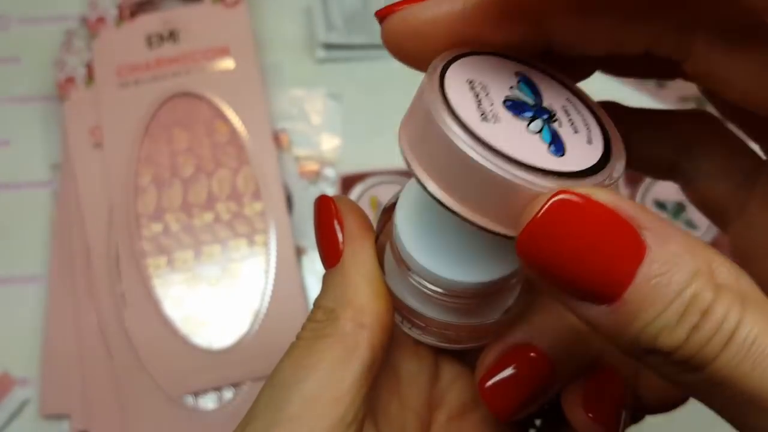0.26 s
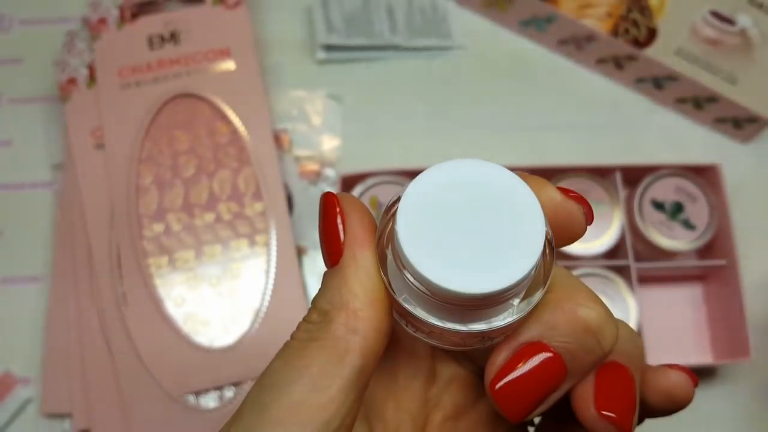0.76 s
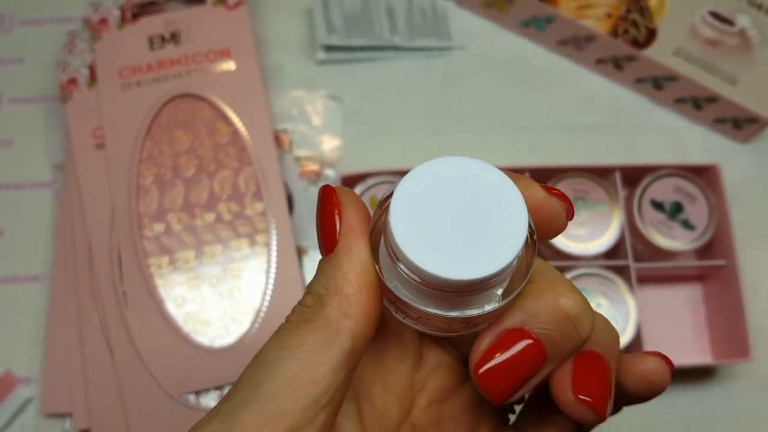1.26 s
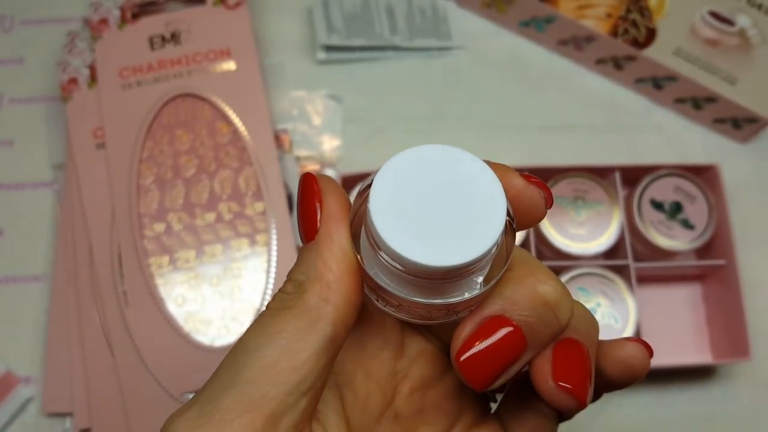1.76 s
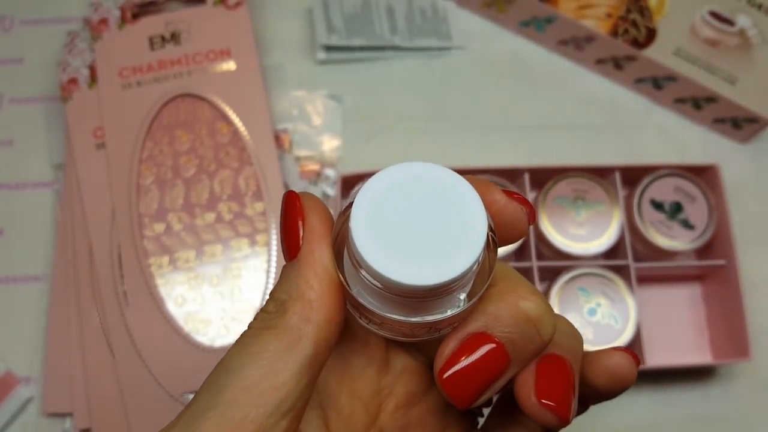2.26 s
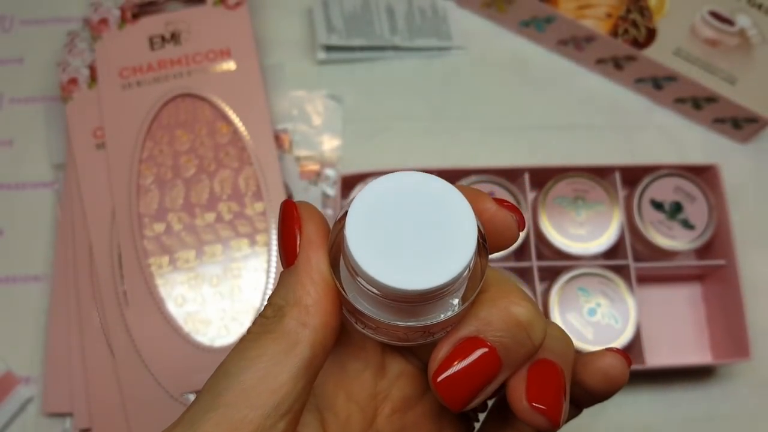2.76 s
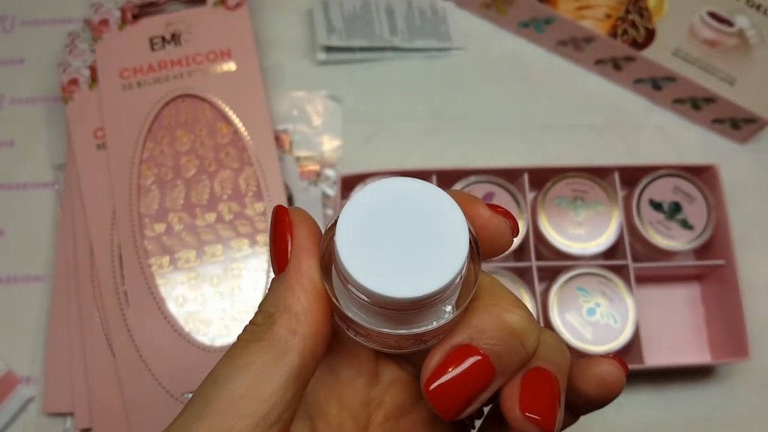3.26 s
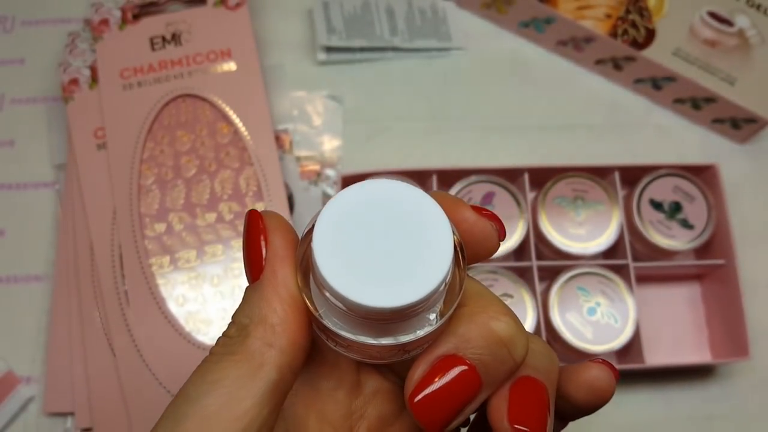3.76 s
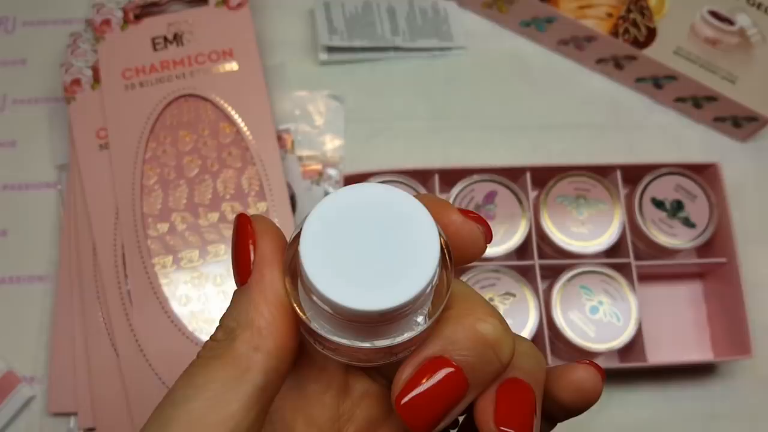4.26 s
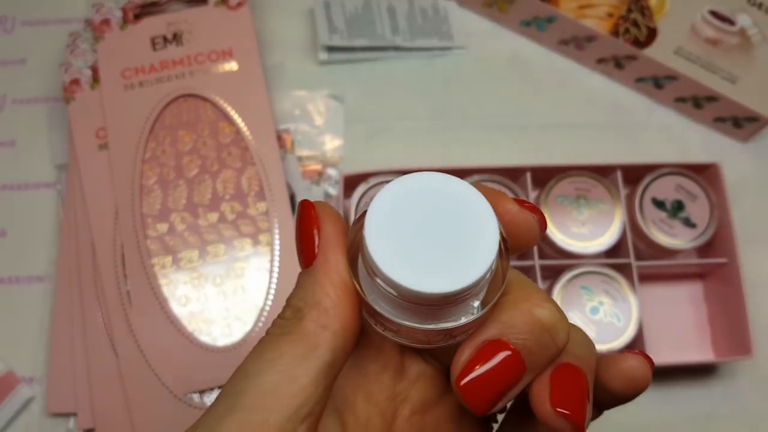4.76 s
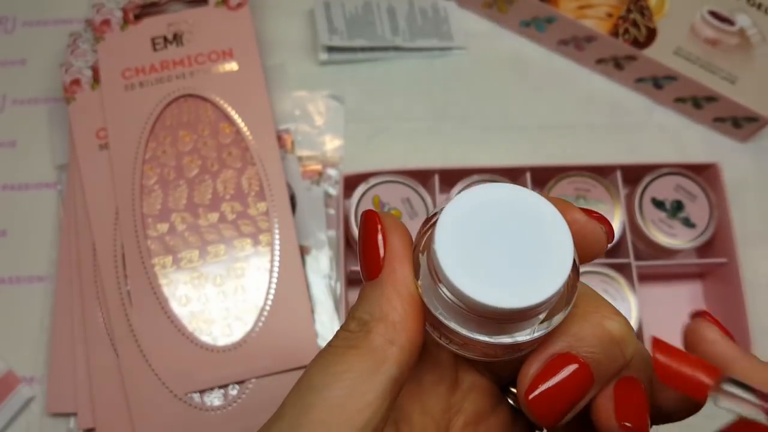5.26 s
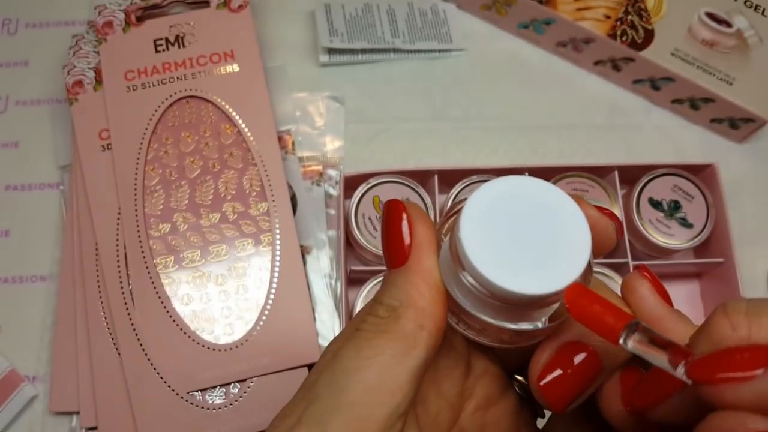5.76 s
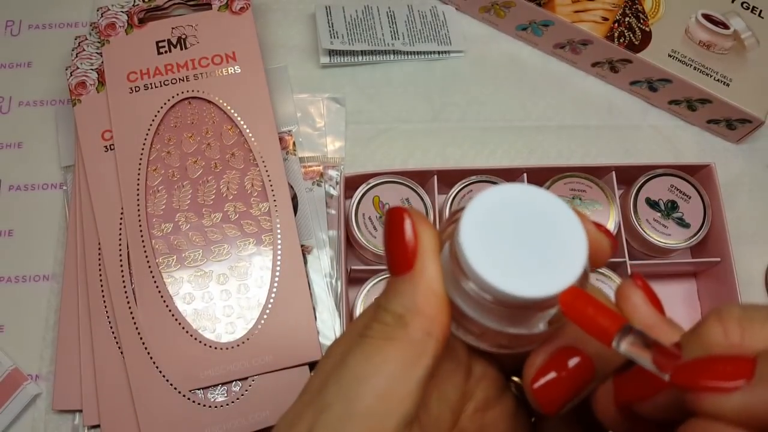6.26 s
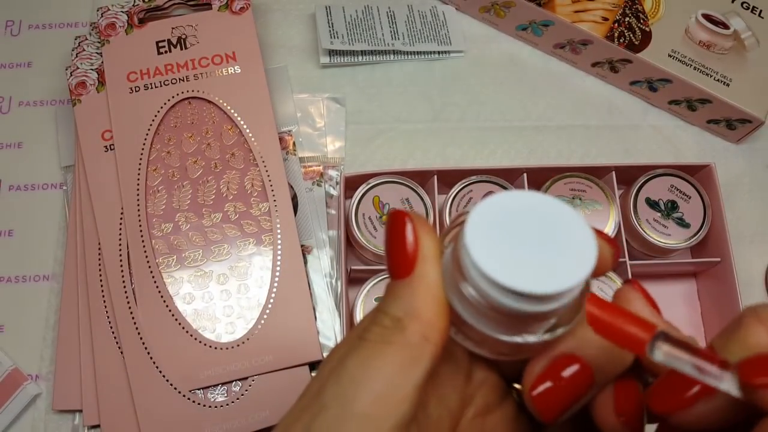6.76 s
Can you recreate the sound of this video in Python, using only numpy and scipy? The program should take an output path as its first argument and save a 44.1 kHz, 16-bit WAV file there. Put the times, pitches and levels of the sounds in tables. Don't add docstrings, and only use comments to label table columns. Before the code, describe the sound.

A plastic lid scrapes briefly over a desk and drops with a loud clack, then soft thumps and clicks, and finally a crackling foil seal peel.

```python
import sys
import numpy as np
from scipy import signal
from scipy.fft import rfft, irfft, next_fast_len
from scipy.io import wavfile
from scipy.ndimage import uniform_filter1d

SR = 44100
rng = np.random.default_rng(int(sys.argv[2]) if len(sys.argv) > 2 else 0)


def waveform_to_disk(signal):
    frames = np.transpose(np.atleast_2d(signal))
    scaled = np.clip(frames, -1, 1) * 32767
    samples = np.round(scaled).astype(np.int16)
    wavfile.write(sys.argv[1], SR, samples)


def rack_gain(trim_db):
    fader = np.asarray(trim_db, float)
    return 10 ** (fader / 20)


N = 309582
T = np.arange(N) / SR

# (frequency [Hz], level [dB])
HISS_SPECTRUM = [(20, -15), (40, -2), (65, 1.5), (170, -1.5), (270, -2), (450, -7.5), (1000, -11),
                 (3000, -15), (5500, -18.5), (7800, -22.5), (9000, -20), (12500, -18), (14500, -23)]
# (frequency [Hz], likeness [-1..1])
HISS_LIKENESS = [(60, 0.062), (240, 0.016), (930, -0.058), (3650, -0.081), (14400, -0.43)]
# (frequency [Hz], left level [dB], right level [dB], left lead [rad])
SUPPLY_TONES = [(49.6, -80.5, -85.5, 0.36), (1358, -79.5, -86.5, 1.57), (2716, -81, -94, 2.8)]
# (time [s], phase [cycles])
READOUT_PHASE = [
    (0, -.34),
    (1.5, .42),
    (2.5, .56),
    (3.02, .1),
    (3.5, .53),
    (6.02, 0),
    (6.72, .5),
]
# (frequency [Hz], t60 [s])
ROOM_T60 = [(100, 0.75), (500, 0.401), (2000, 0.39), (5000, 0.47), (12000, 0.2)]
# (frequency [Hz], likeness [-1..1])
ROOM_LIKENESS = [(100, 1), (300, 1), (700, 1), (1400, 0.106)]
# (frequency [Hz], width [Hz], level [dB])
DESK_MODES = [(88.6, 9.9, -32.5), (112.4, 20.5, 6.5), (166.1, 38.2, -11), (176, 9.2, 0.5), (291.4, 46.6, 8),
              (407, 19.8, -14.5)]
# (time [s], peak level [dB], push [Hz], desk ring level [dB], upper modes level [dB])
SOFT_BLOWS = [(1.088, -58.5, 117, -58.5, -63.5), (1.14, -68, 111, -63.5, -90.5),
              (1.733, -41, 332.5, -46.5, -57.5), (1.777, -65, 115.4, -64, -50.5),
              (1.922, -50.5, 330, -74.5, -39), (2.403, -27.5, 354.7, -53, -45),
              (3.756, -39.5, 164.5, -53, -48), (3.848, -52, 106, -71.5, -70.5),
              (4.023, -52.5, 107, -56, -55.5), (4.219, -37.5, 134.7, -52, -46.5),
              (4.338, -53, 285, -52, -52.5), (4.393, -45.5, 118.7, -52, -48),
              (4.499, -35.5, 107.7, -67.5, -50.5), (4.546, -34.5, 152.2, -55, -43.5),
              (4.561, -33, 119.6, -54, -62)]
# (time [s], strength [dB], hardness [dB], shell pitch [Hz], weight [dB])
SMALL_CONTACTS = [(1.05, -62, 11.5, 3400, -7), (1.3498, -59, 0.5, 3970, -8.5), (1.7322, -44, 7, 1440, 0),
                  (1.7681, -41.5, -20, 1692, -13), (1.8914, -35, -30.5, 2160, -28.5),
                  (1.9319, -43.5, 21, 3360, -12), (1.9407, -55.5, 21, 1420, -10),
                  (2.604, -47.5, 10, 2804, -1.5), (3.7564, -55, 2.5, 3460, 5.5),
                  (4.0325, -49.5, -4.5, 1518, -0.5), (4.2201, -67, 7.5, 1670, 11),
                  (4.2497, -81.5, 25.5, 2330, -4), (4.3936, -64, -0.5, 4090, 11),
                  (4.489, -54, -3.5, 1552, -5), (4.5469, -52, -1.5, 1570, -2), (4.559, -49.5, 5, 2009, 0.5),
                  (4.57, -56, 16.5, 4578, -13), (4.856, -64, 6.5, 2200, -19), (4.8695, -56, 4, 2689, -17)]
# (time [s], length [s], weight [dB], roughness [dB], fineness [dB])
BRUSH_STROKES = [(0.693, 0.137, -72, -4.5, 2), (1.07, 0.255, -83.5, 12, 13.5),
                 (3.749, 0.0866, -61.5, -21.5, 0.5), (3.857, 0.149, -75.5, 9.5, 8.5),
                 (4.032, 0.085, -81.5, -0.5, 2), (4.243, 0.0774, -64, 0, -15.5), (4.305, 0.1164, -61, 9, 1),
                 (4.539, 0.0374, -48, -7, -4.5), (4.59, 0.153, -70.5, -12.5, -6), (4.79, 0.096, -78, 3, 15),
                 (5.74, 0.115, -72.5, -2.5, -4.5), (6.07, 0.0643, -78, -7, -4)]
# (time [s], pull level [dB])
SEAL_PULL = [
    (6.46, -84.5),
    (6.5, -65.5),
    (6.585, -65),
    (6.6, -75),
    (6.615, -65),
    (6.66, -62.5),
    (6.69, -57),
    (6.75, -58.5),
    (6.81, -70.5),
]
# (time [s], peak level [dB], snap [Hz], depth [dB], jar wall [Hz])
GLUE_CRACKS = [(6.3944, -45, 10900, -9, 1375), (6.4627, -52, 10900, -24, 1360),
               (6.4799, -57.5, 6310, -23.5, 3860), (6.4975, -43, 6100, -33, 3860),
               (6.5095, -48.5, 9500, -22, 3780), (6.5148, -52, 5130, -15, 3390),
               (6.525, -47, 5100, -8.5, 1210), (6.5296, -34, 6170, -29, 3080),
               (6.5558, -44, 11300, -13, 4070), (6.573, -44.5, 10830, -26, 4340),
               (6.5888, -38.5, 13900, -37.5, 4130), (6.6104, -54.5, 12000, -25.5, 1224),
               (6.614, -39.5, 12100, -29.5, 3490), (6.6204, -45, 13700, -24, 3690),
               (6.6436, -48, 12800, -7.5, 2160), (6.6727, -39, 13700, -35.5, 3930),
               (6.6784, -42.5, 13340, -31, 3850), (6.6983, -46, 12820, -27, 3645),
               (6.7458, -45.5, 13670, -16.5, 3295), (6.7664, -44, 11000, -25.5, 1330),
               (6.7915, -52, 10760, -21.5, 1010), (6.7974, -46, 9850, -13.5, 1360)]
# (time [s], pressure [dB], speed [dB])
LID_SLIDE = [
    (1.75, -80, 13),
    (1.775, -56, 8.5),
    (1.9, -57.5, 8),
    (1.925, -64.5, 5.5),
    (1.96, -53.5, 0.5),
    (1.99, -44.5, -2.5),
    (2.15, -46, 0.5),
    (2.26, -48, -6),
    (2.395, -45, -15),
]
# (time [s], peak level [dB], rim pitch [Hz], cavity level [dB])
RIM_CATCHES = [(1.986, -44.5, 2880, -3), (2.0018, -48, 2900, 7.5), (2.0233, -44, 3250, 2),
               (2.0434, -47, 3460, 2.5), (2.0624, -40.5, 2840, 1.5), (2.0722, -38.5, 3070, -2.5),
               (2.0815, -40, 3036, 2), (2.0984, -46, 3000, 3), (2.1094, -42, 3020, 2.5),
               (2.1332, -34.5, 3020, -0.5), (2.146, -40, 3070, -0.5), (2.156, -45, 3290, 10.5),
               (2.1653, -33, 3130, -3.5), (2.1884, -47.5, 3040, -2), (2.2176, -47, 2700, -0.5),
               (2.2518, -51, 2940, -0.5), (2.2762, -54.5, 2890, 0), (2.2994, -46.5, 2750, 4.5),
               (2.363, -48, 3065, -1)]
# (frequency [Hz], level [dB per Hz])
SCRAPE_SPECTRUM = [(900, 7), (1300, 6), (2200, 1), (3500, -6), (5000, -17.5), (7000, -27), (12000, -40.5)]
# (frequency [Hz], width [Hz], level [dB])
LID_MODES = [(374, 80, -21.5), (497.6, 59, 2), (597.1, 72, 6), (715.1, 46, -0.5), (939.5, 38, -1),
             (1277, 147, -5), (1607, 350, -3), (2048, 260, 0), (2205, 183, 0), (3070, 220, -8.5),
             (3330, 160, -8.5), (4606, 2000, -21), (6370, 2300, -36)]
# (time [s], peak level [dB])
LID_LANDINGS = [
    (2.4015, -17),
    (2.4024, -6),
    (2.4047, -15.5),
    (2.4133, -8.5),
    (2.43, -19),
    (2.443, -17),
]


def unit(x):
    return x / np.sqrt(np.mean(x ** 2) + 1e-20)


def along(points, hz):
    f, v = np.transpose(points)
    return np.interp(np.log(hz + 1), np.log(f + 1), v)


def curve(rows):
    s, *cols = np.transpose(rows)
    return [np.interp(T, s, c, left=-200, right=-200) for c in cols]


def filtered(x, response):
    m = next_fast_len(N + 8192)
    return irfft(rfft(x, m) * response(np.fft.rfftfreq(m, 1 / SR)), m)[..., :N]


def colour(spectrum):
    return lambda hz: rack_gain(along(spectrum, hz))


def modes(table):
    def response(f):
        total = 0
        for k, (centre, width, db) in enumerate(table):
            total = total + (-1) ** k * rack_gain(db) * width / (centre ** 2 - f * f + 1j * width * f)
        return 1j * f * total
    return response


def pair(x, alike, response):
    def split(hz):
        turn = np.arccos(np.clip(along(alike, hz), -1, 1)) / 2
        return response(hz) * [np.cos(turn), np.sin(turn)]
    mid, side = filtered(x, split)
    return np.array([mid + side, mid - side])


def blows(times, dbs):
    return np.bincount(np.round(times * SR).astype(int), rack_gain(dbs), N)


def rings(times, dbs, hzs, t60, rough=0, rise=0):
    t = np.arange(round(t60 * SR) + 8) / SR
    out = np.zeros(N + SR)
    flutter = 1 + rough * rng.standard_normal((len(times), len(t)))
    flutter *= 1 - np.exp(-t / (rise + 1 / SR))
    for s, db, hz, f in zip(times, dbs, hzs + 0 * times, flutter):
        out[round(s * SR):][:len(t)] += rack_gain(db - 60 * t / t60) * f * np.sin(2 * np.pi * hz * t)
    return out[:N]


def bursts(times, dbs, t60):
    t = np.arange(1000) / SR
    out = np.zeros(N + 1000)
    puffs = rng.standard_normal((len(times), len(t))) * rack_gain(-60 * t / t60)
    for s, db, puff in zip(times, dbs, puffs):
        out[round(s * SR):][:len(t)] += rack_gain(db) * puff / abs(puff).max()
    return out[:N]


def grit(rate, spread_db):
    when, size, sign = rng.random((3, int(rate * N / SR)))
    push = rack_gain(spread_db * np.minimum(-np.log(size + 1e-9), 2)) * np.sign(sign - .5)
    return unit(np.bincount((when * N).astype(int), push, N))


def grains(rate, centre_hz, octaves, cycles, spread_db, size=64):
    draw = rng.standard_normal((int(rate * N / SR), 2))
    start = rng.integers(0, N, len(draw))
    t = np.arange(size) / SR
    hz = np.clip(centre_hz * 2 ** (octaves * draw[:, :1]), 250, 14000)
    loudness = rack_gain(spread_db * draw[:, 1:].clip(-3, 1.8))
    wave = loudness * np.sin(2 * np.pi * hz * t) * np.exp(-hz * t / cycles)
    wave = np.gradient(wave, axis=1)
    place = start[:, None] + np.arange(size)
    return unit(np.bincount(place.ravel(), wave.ravel(), N)[:N])


def hiss():
    return rack_gain(-66.5) * unit(pair(rng.standard_normal((2, N)), HISS_LIKENESS, colour(HISS_SPECTRUM)))


def whine():
    tones = np.zeros((2, N))
    for hz, left_db, right_db, lead in SUPPLY_TONES:
        tones += 2 ** .5 * rack_gain([[left_db], [right_db]]) * np.sin(2 * np.pi * hz * T + [[lead], [0]])
    frame_hz, readout_hz = 29.8, 10894
    s, phase = np.transpose(READOUT_PHASE)
    slip = phase[np.searchsorted(s, T, "right") - 1]
    cycle = (frame_hz * T + slip + .5) % 1 - .5
    reading = uniform_filter1d(1. * (abs(cycle) < .21), 40)
    return tones + reading * rack_gain([[-70], [-86]]) * np.sin(2 * np.pi * readout_hz * T + [[1.5], [0]])


def lens():
    step_hz, start_s, fast_from_s = 33.475, .0085, 4.99
    count = np.arange(int(2 * step_hz * N / SR) - 1)
    s = start_s + count / (2 * step_hz)
    s = s[(count % 2 == 0) | (s > fast_from_s)]
    steps = bursts(s, rng.normal(.5, 1.6, len(s)), t60=.016)
    left = modes([(7000, 660, -77.0), (10200, 650, -43), (12600, 8100, -52.5)])
    right = modes([(6960, 460, -41.5), (10400, 820, -132)])
    return np.array([filtered(steps, left), filtered(steps, right)])


def room(x):
    step = SR // 4
    wet = np.zeros((2, N + SR))
    hz, t, z = signal.stft(rng.standard_normal((5, 2, SR * 2 // 5)), SR, nperseg=256)
    decay = rack_gain(-60 * t / along(ROOM_T60, hz)[:, None])
    tails = signal.istft(z * decay, SR, nperseg=256)[1]
    for k, start in enumerate(range(0, N, step)):
        part = x[start:start + step]
        if abs(part).max() < 1e-5:
            continue
        tail = tails[k % len(tails)]
        echo = signal.fftconvolve(part[None], tail / np.linalg.norm(tail[0]), axes=1)
        wet[:, start + 260:][:, :echo.shape[1]] += echo
    return pair(wet[:, :N], ROOM_LIKENESS, np.ones_like)


def desk_top(x, lag, scatter_db, clear):
    step = SR // 40
    t = np.arange(400) / SR
    out = np.zeros((2, N + SR))
    noise = rng.standard_normal((N // step + 1, 2, len(t))) * rack_gain(-60 * t / 0.008)
    clutter = signal.lfilter(*signal.butter(N=2, Wn=800, btype="high", fs=SR), noise)
    paths = rack_gain(scatter_db) * clutter / np.linalg.norm(clutter, axis=-1, keepdims=True)
    bend = np.exp(-2 * np.pi * 1500 * t)
    straight = bend / bend.sum() * (1 - clear) + clear * (t == 0)
    paths[:, 0, lag:] += straight[:len(t) - lag]
    paths[:, 1] += straight
    spectrum = rfft(paths, 1024)
    paths = irfft(spectrum / (abs(spectrum) + .05) ** .6)[..., :700]
    for k, path in enumerate(paths):
        part = signal.fftconvolve(x[None, k * step:(k + 1) * step], path, axes=1)
        out[:, k * step:][:, :part.shape[1]] += part
    return out[:, lag // 2:][:, :N]


def thumps():
    s, db, hz, ring_db, upper_db = np.transpose(SOFT_BLOWS)
    push = rings(s, db + 5, hz, t60=0.063, rise=0.005)
    low = rings(s, ring_db, 114, t60=0.321, rise=0.006142)
    low += rings(s, ring_db - 4.5, 84, t60=0.21, rise=0.0071)
    upper = rings(s, upper_db - 5, 300, t60=0.2308, rise=0.00477)
    upper += rings(s, upper_db - 3.5, 385, t60=0.074, rise=0.001467)
    return push + low + upper


def taps(s, shell_db, hard_db, shell_hz, weight_db, snap_hz, snap_s):
    snap = rings(s, shell_db + hard_db - 8.5, snap_hz, t60=snap_s, rough=4.09, rise=snap_s / 15)
    snap = np.diff(snap, prepend=0)
    click = rings(s, shell_db + 11, 2450, t60=0.00107)
    shell = rings(s, shell_db + 3, shell_hz, t60=.011, rough=.7, rise=.0005)
    body = modes([(372, 251, -5.5), (767, 123, 4.5), (1022, 1845, -8.5)])
    knock = filtered(blows(s, shell_db + weight_db + 37), body)
    return snap + click + shell + knock


def seal_cracks():
    s, db, hz, depth_db, wall_hz = np.transpose(GLUE_CRACKS)
    return taps(s, db + depth_db + 1.5, 2 - depth_db, wall_hz, -14.5, hz, snap_s=.002)


def peel():
    pull, = curve(SEAL_PULL)
    thinning_db = -38.5 * (T - SEAL_PULL[1][0]).clip(0)
    cracks = grains(350, 4300, octaves=.45, cycles=.8, spread_db=5)
    fizz = grains(2200, 12000, octaves=.33, cycles=1.8, spread_db=5)
    jar = unit(filtered(grit(300, spread_db=4), modes([(280, 200, 0), (1300, 900, -6)])))
    return rack_gain(pull - 0.5 + thinning_db) * cracks + rack_gain(pull) * fizz + rack_gain(pull - 15.5) * jar


def strokes():
    press, speed = curve(LID_SLIDE)
    rumble = (press > -100) * rack_gain(-57.5 + 0.3033 * (press + 54))
    rustle = rack_gain(press + 1.65 * speed - 18)
    gains = np.array([rumble, rack_gain(press), rack_gain(press + speed + 1), rustle])
    for s, length, db, rough_db, fine_db in BRUSH_STROKES:
        swell = abs(np.sin(np.pi * np.clip((T - s) / length, 0, 1))) ** 0.573 * (T < s + length)
        layers_db = np.array([[0], [rough_db - 11.5], [rough_db - 11], [fine_db - 7]])
        gains += swell * rack_gain(db + layers_db)
    return gains


def drag():
    rumble, hum, scrape, rustle = strokes()
    s, db, rim_hz, cavity_db = np.transpose(RIM_CATCHES)
    catches = rings(s, db + 2, rim_hz, t60=.013, rise=.0003)
    catches += rings(s, db + cavity_db, 1950, t60=.016, rise=.0003)
    catches += rings(s, db + 4, rng.uniform(450, 1000, len(s)), t60=.04, rise=.001)
    desk = unit(filtered(grit(600, spread_db=1), lambda f: modes(DESK_MODES)(f) * (f > 70)))
    hollow = grains(650, 501, octaves=0.494, cycles=6, spread_db=5, size=400)
    rim = grains(900, 1700, octaves=.7, cycles=1.5, spread_db=4, size=128)
    rim = unit(filtered(rim, colour(SCRAPE_SPECTRUM)))
    fine = grains(2500, 5200, octaves=.7, cycles=2.5, spread_db=3, size=32)
    return catches + rumble * desk + hum * hollow + scrape * rim + rustle * fine


def clack():
    s, db = np.transpose(LID_LANDINGS)
    impacts = blows(s[:3], db[:3] + 27)
    bounces = filtered(blows(s[3:], db[3:] + 30), lambda f: 1 / (1 + 1j * f / 1300) ** 2)
    crack = rings(s[:2], db[:2] - 28, 5500, t60=0.012, rough=1.6)
    return filtered(impacts + bounces, modes(LID_MODES)) + crack


def scene():
    sliding, soft, drop = drag(), thumps(), clack()
    foil = peel() + seal_cracks()
    hits = taps(*np.transpose(SMALL_CONTACTS), snap_hz=10606, snap_s=0.011)
    direct = desk_top(sliding + hits + soft + drop, lag=12, scatter_db=0, clear=.45)
    direct += desk_top(foil, lag=0, scatter_db=-5, clear=.9)
    wet = room(rack_gain(-6) * sliding + 0.462 * hits + rack_gain(-10.5) * soft + rack_gain(-8) * drop + .13 * foil)
    return rack_gain([[-1.1], [1.1]]) * (direct + wet) + lens() + whine() + hiss()


def top_cut(x):
    return signal.sosfilt(signal.butter(12, 14980, fs=SR, output="sos"), x)


def record(dry):
    heard = signal.sosfilt(signal.cheby1(N=10, rp=.5, Wn=14600, fs=SR, output="sos"), dry)
    heard = signal.sosfilt(signal.butter(N=1, Wn=45, btype="high", fs=SR, output="sos"), heard)
    return top_cut(heard - .00044)


dry = scene()
out = record(dry)
waveform_to_disk(out)
```